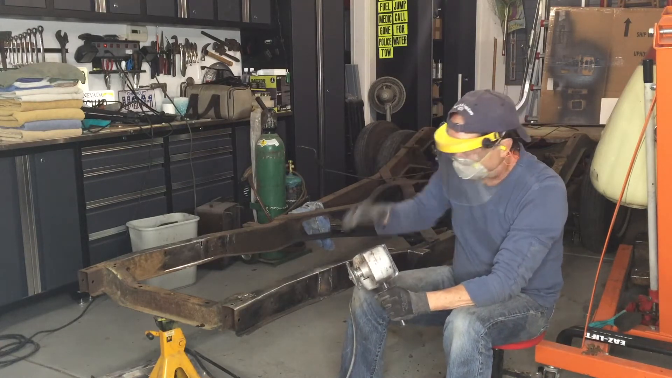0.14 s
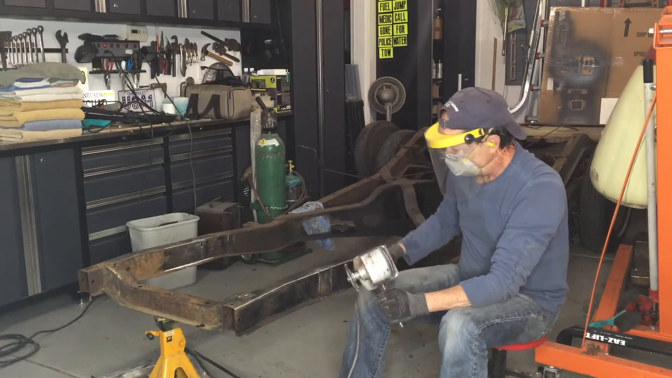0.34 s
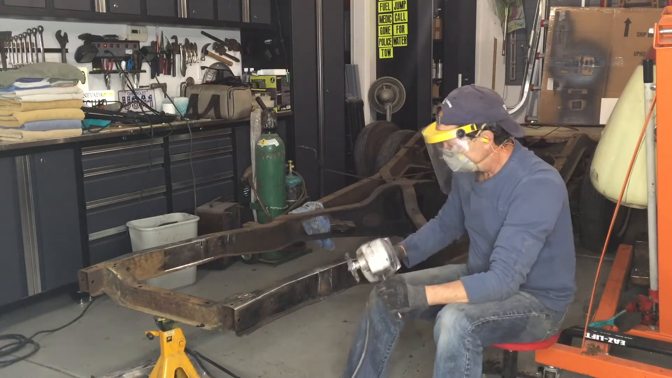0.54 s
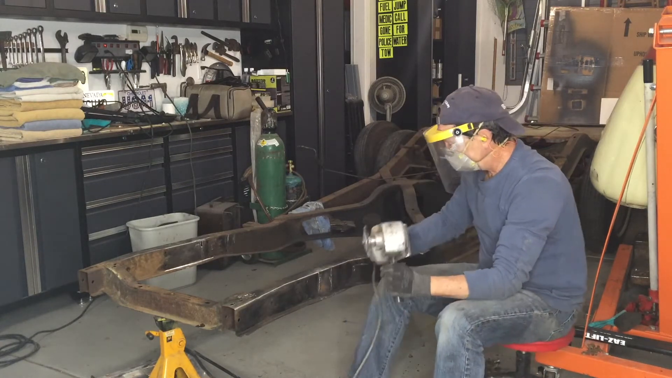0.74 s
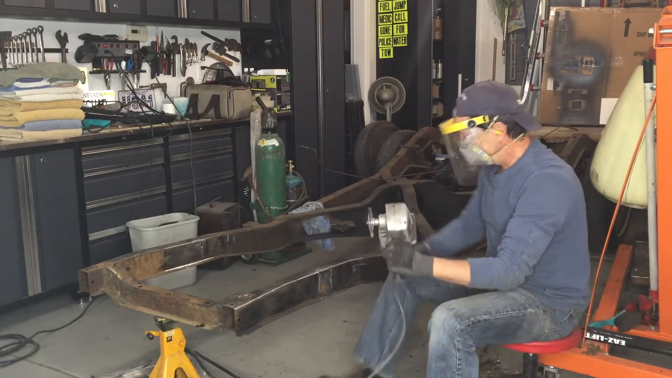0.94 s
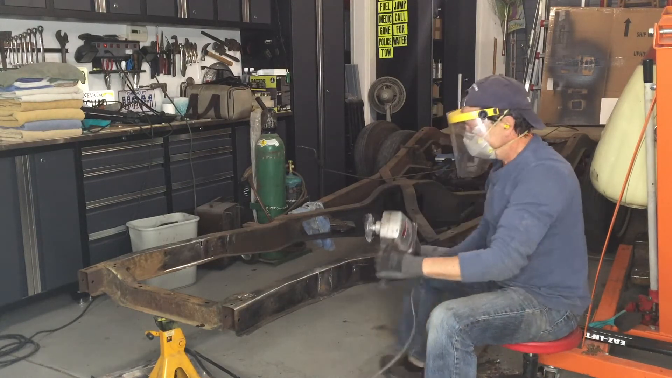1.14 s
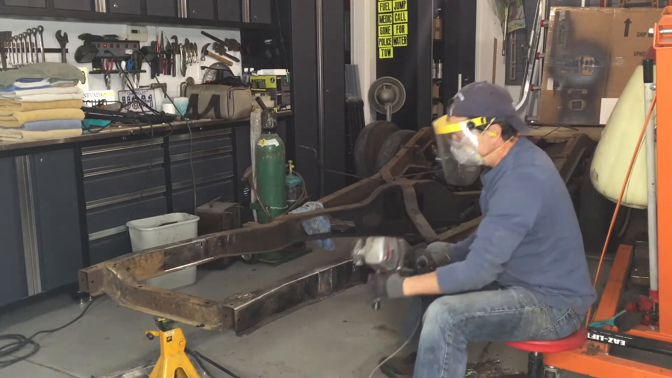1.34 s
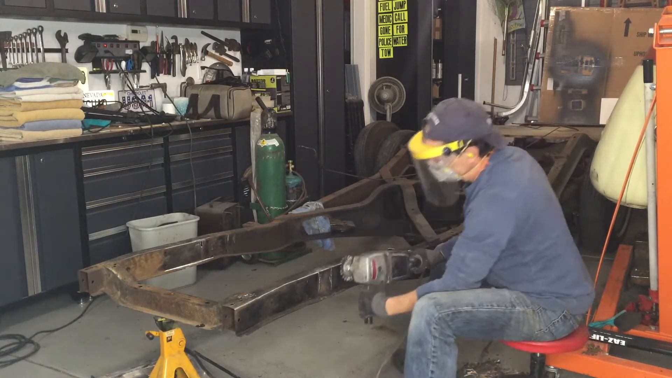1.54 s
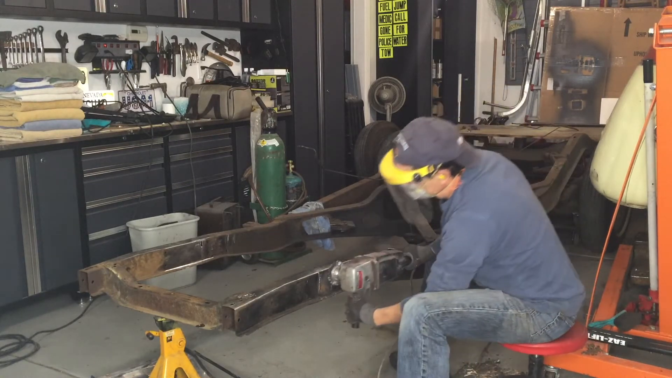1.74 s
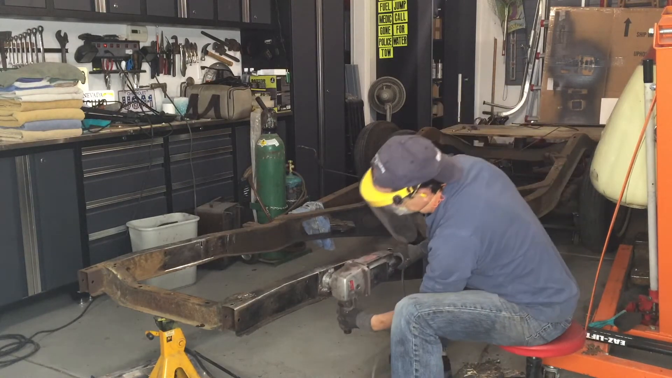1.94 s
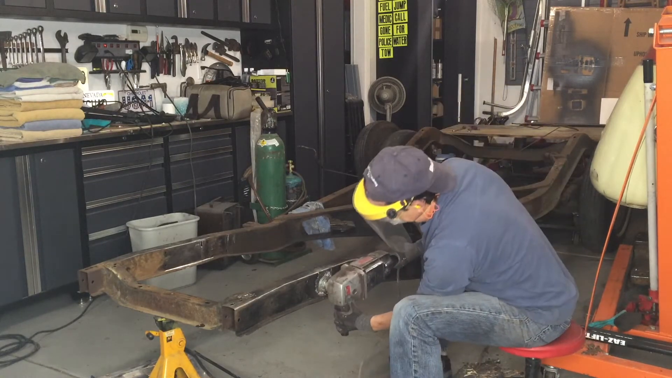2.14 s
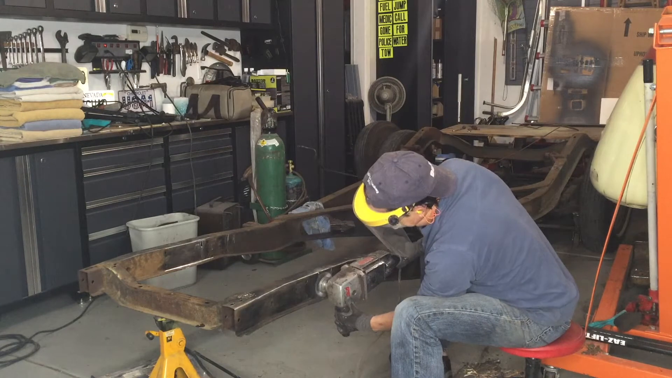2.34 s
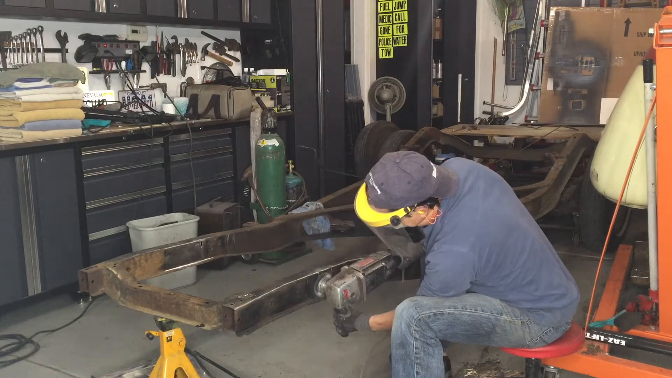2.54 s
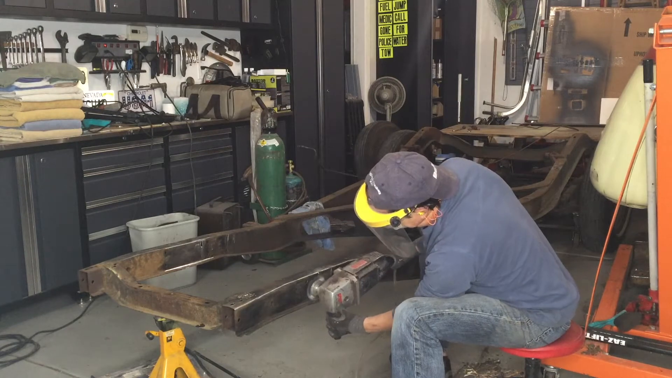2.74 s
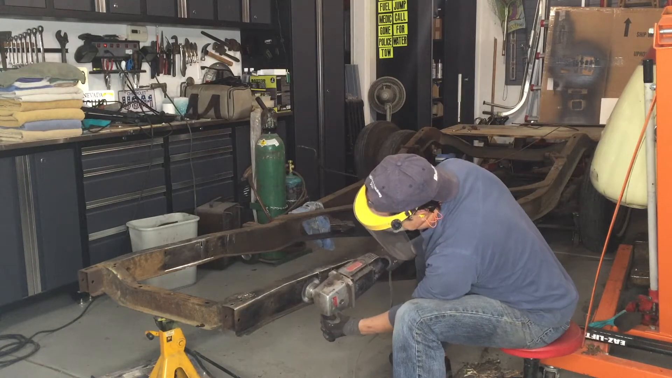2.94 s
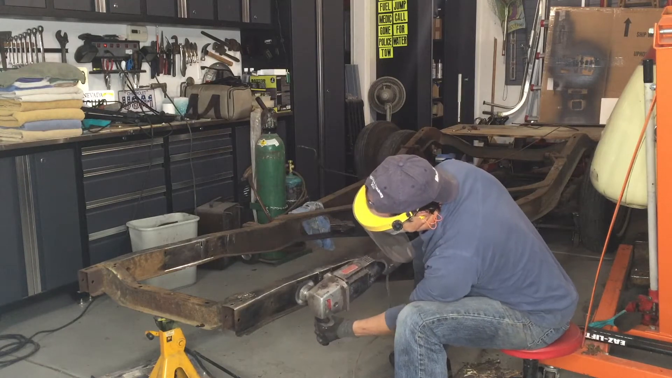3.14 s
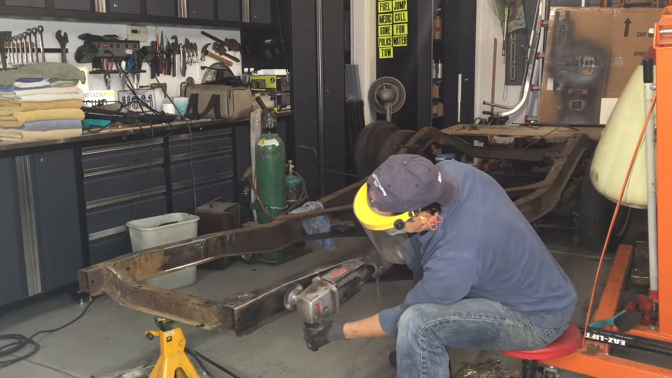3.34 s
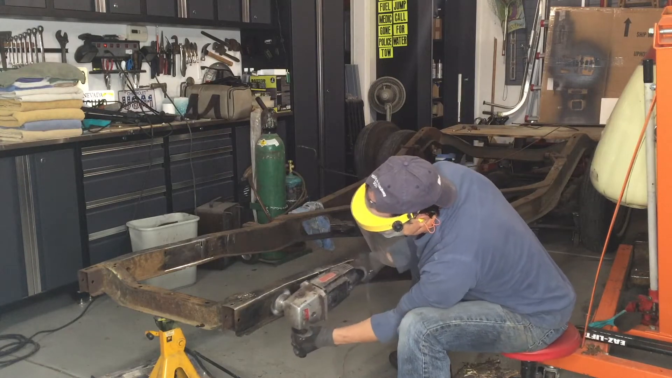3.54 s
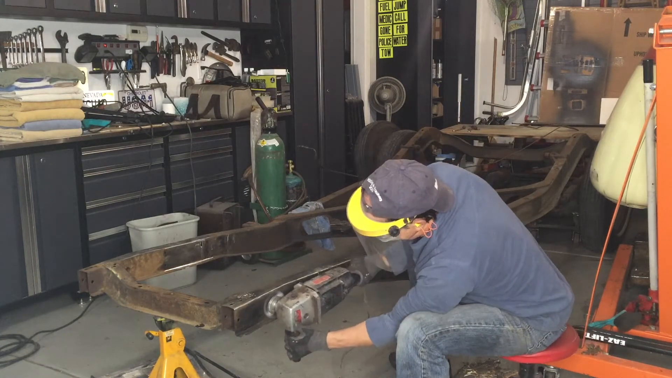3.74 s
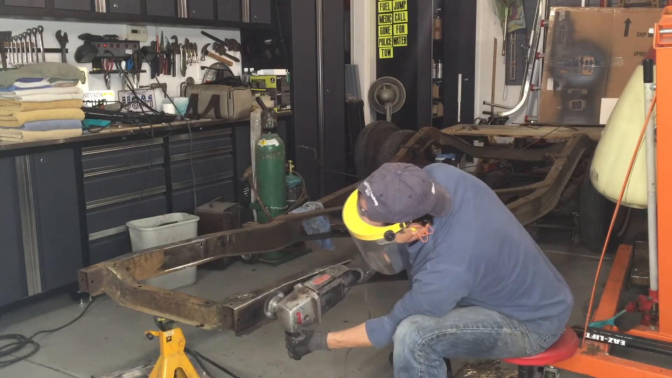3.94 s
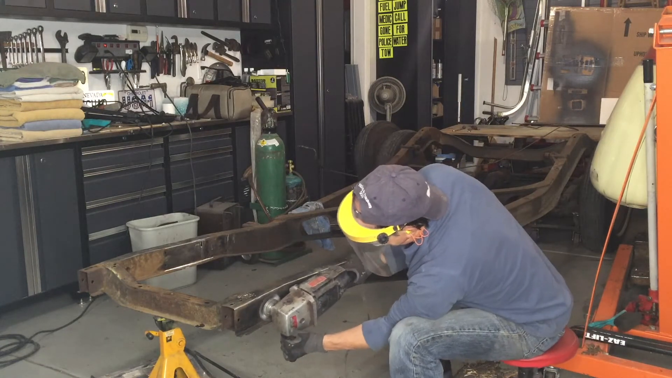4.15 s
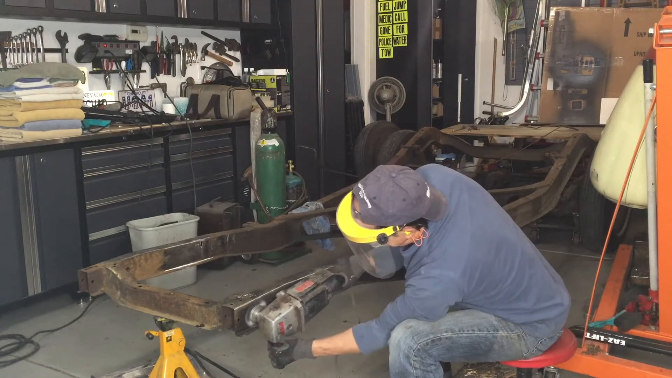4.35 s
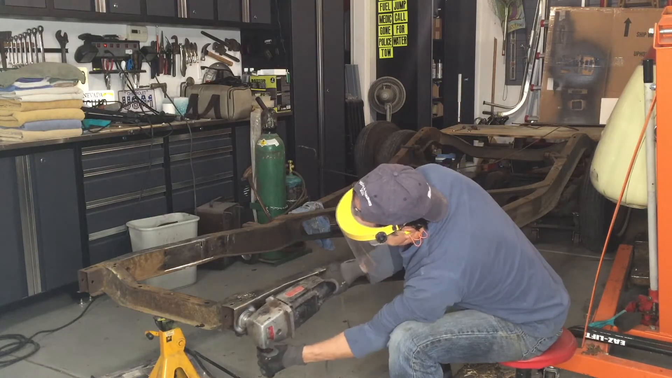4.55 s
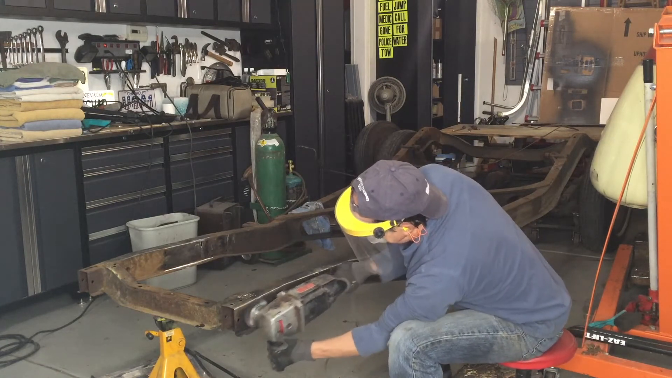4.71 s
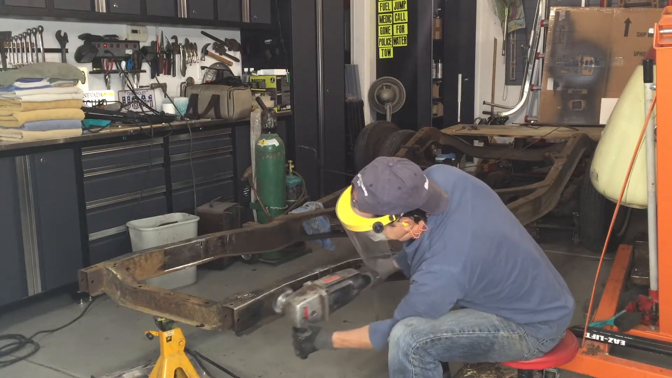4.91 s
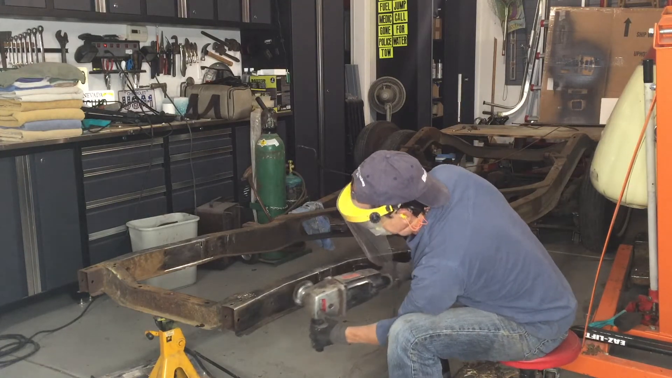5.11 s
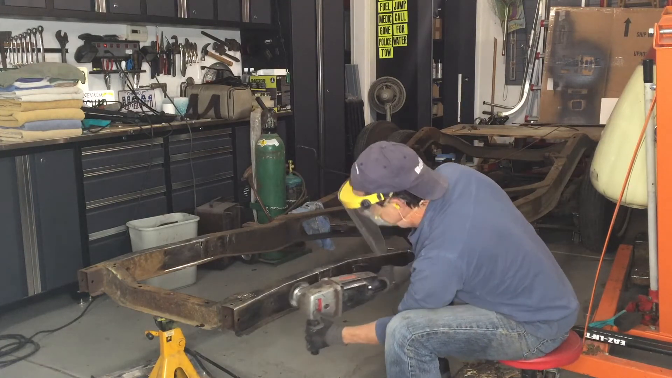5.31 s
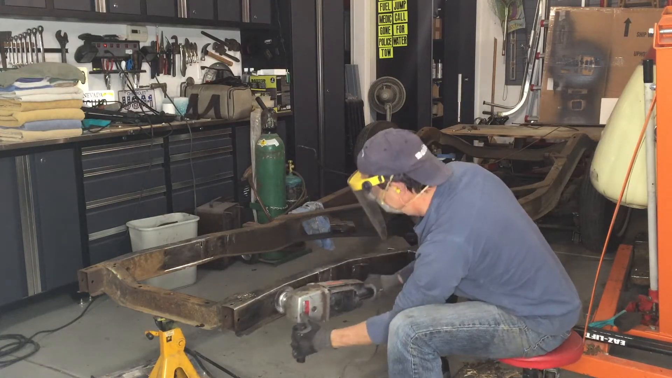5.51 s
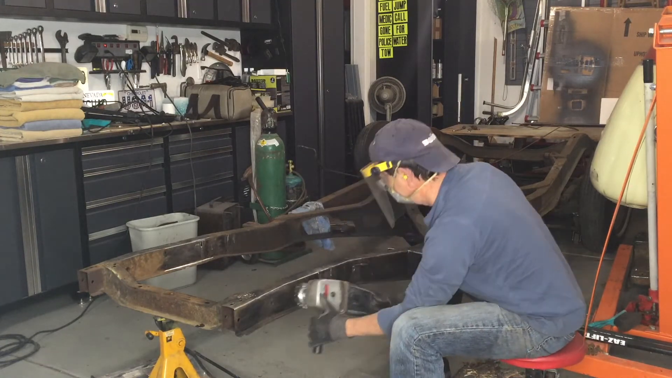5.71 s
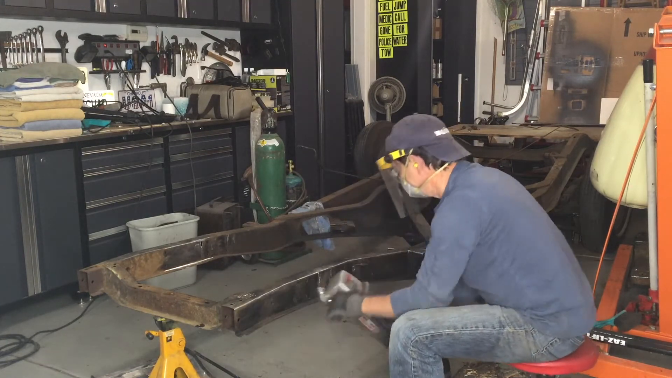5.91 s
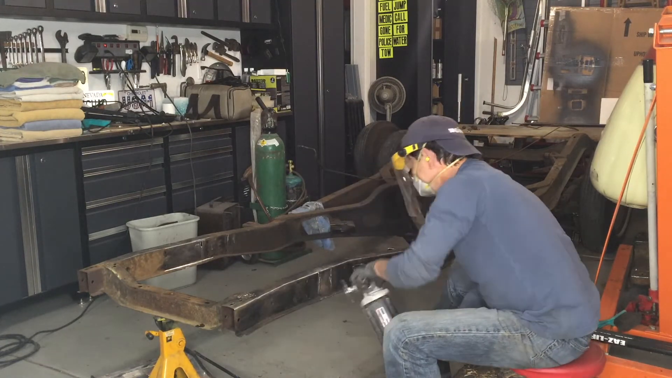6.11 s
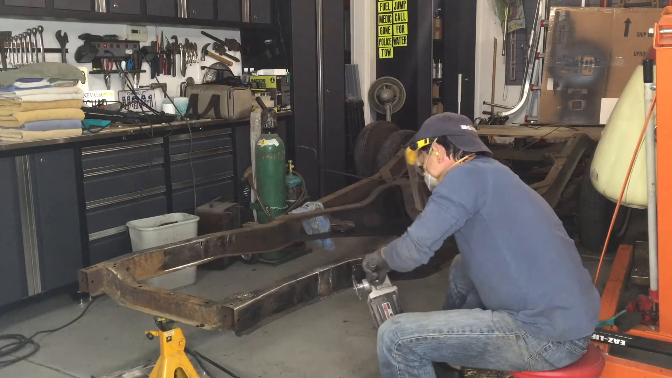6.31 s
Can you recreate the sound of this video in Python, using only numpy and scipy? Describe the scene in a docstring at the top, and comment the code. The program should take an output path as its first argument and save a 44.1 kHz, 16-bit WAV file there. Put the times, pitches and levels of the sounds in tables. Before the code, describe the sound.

A quiet garage with faint low background, heard from a few metres away with short echo. From 0.4 s a rolling stool jolts and rumbles, strongest near 0.7, with gritty crackle, scuffing cloth and soles, a rattling fitting and a caster squeak at 0.8. A sharp metal tick falls at 0.9; more caster bumps and a foot thump come around 1.4. The tool knocks firmly at 2.1 and again at 2.25. At 2.3 the grinder bursts on, running up rapidly, whirring and hissing, with harsh catches on ringing steel near 2.4 and 2.6. Released at 2.7, it coasts with a falling scrape. A shorter pull at 3.7 brings judder and scraping; then it slows, gear whine sinking, steel droning and rasping in separate rubs until 5.4. From 5.5 it brakes amid knocks, thin ringing, a squeak at 5.9 and soft brushing at 6.0, stopping near 6.3 with a shoe scuff.

```python
"""A worker shifts about on a rolling stool in a garage: casters rumble and squeak, shoes and sleeves scuff.
A tool knocks, then an angle grinder with a wire wheel is blipped twice and coasts down after each pull.
Gears whirr and wires hiss as random showers of tiny strikes; catches, rubs and scrapes make the steel sing.
The wheel brakes to a stop amid soft brushing, while the tool knocks again, a caster squeaks and a shoe scuffs.
Noise shaped by spectra makes the rough sounds, fading or wavering sine waves make the ringing ones."""
import sys
import numpy as np
from scipy import signal
from scipy.fft import rfft, irfft, next_fast_len
from scipy.io import wavfile
from scipy.ndimage import uniform_filter1d, map_coordinates

SR = 44100
rng = np.random.default_rng(int(sys.argv[2]) if len(sys.argv) > 2 else 0)


def persist_wave(psi):
    """Save psi, clipped to +-1, as 16-bit WAV."""
    counts = np.round(np.clip(psi, -1, 1) * 32767).astype(np.int16)
    wavfile.write(sys.argv[1], SR, np.atleast_2d(counts).T)


N = 285327
TIME = np.arange(N) / SR  # s
FULL_SPEED = 152  # turns/s

# pulls of the trigger: on (t/s), off (t/s), speed aimed at (turns/s), time constant of the run-up (t/s)
PULLS = [(2.314, 2.68, 151.5, .08), (3.725, 3.89, 143, .048)]
# pushes that roll the stool: start (t/s), length (t/s), level/dB
PUSHES = [(.5, 0.17, -59), (.67, 0.29, -52), (1.35, 0.089, -54), (1.7, .15, -81), (5.87, 0.035, -46)]
# spectrum of rubbing cloth and soles, also used for clicks and grit: f/Hz, relative level/dB
CLOTH = [(290, -13), (500, -4.5), (649, -5.5), (893, -1.5), (1320, 0), (1420, -2.5), (1930, 3), (2770, 3),
         (4800, -6), (5710, -3), (7750, -13), (9220, -14.5), (10700, -20), (12700, -18), (16000, -27)]


def amp(db):
    """Turn decibels into a gain."""
    return 10 ** (np.asarray(db) / 20)


def unit(x):
    """Scale to an average strength (rms) of 1."""
    return x / np.sqrt(np.mean(x ** 2) + 1e-20)


def along(points, hz):
    """Read a curve of (frequency, value) points on a logarithmic frequency axis."""
    f, v = np.transpose(points)
    return np.interp(np.log(hz + 1), np.log(f + 1), v)


def wobble(rate):
    """A smooth random curve through a given number of random points a second."""
    points = rng.standard_normal(int(N * rate / SR) + 4)
    return map_coordinates(points, [TIME * rate])


def filtered(x, response):
    """Multiply the spectrum of a sound by a response that depends on frequency."""
    padded = next_fast_len(len(x) + 8192)
    hz = np.fft.rfftfreq(padded, 1 / SR)
    return irfft(rfft(x, padded) * response(hz), padded)[:len(x)]


def noise(spectrum):
    """Random noise of rms 1 with the given spectrum."""
    return unit(filtered(rng.standard_normal(N), lambda hz: amp(along(spectrum, hz))))


def swell(start, length, attack, t60):
    """One gesture: a straight rise, a hold, and a release that falls 60 dB in t60 seconds."""
    rise = np.clip((TIME - start) / attack, 0, 1)
    return rise * amp(-60 * np.maximum(TIME - start - length, 0) / t60)


def swells(rows, attack, t60):
    """Envelope of a row of gestures, each (start, length, level)."""
    return sum(amp(db) * swell(start, length, attack, t60) for start, length, db in rows)


def blows(times, levels, t60, attack):
    """Envelope of a row of blows, each rising fast and dying away."""
    age = np.maximum(TIME - np.asarray(times)[:, None], 0)
    decay = np.exp(-np.log(1000) * age / t60)
    return amp(levels) @ (decay * (1 - np.exp(-age / attack)))


def ringing(times, levels, modes, stretch, scatter_db, smear):
    """Each blow rings every mode, a slightly wavering sine wave, at a new random strength."""
    total = 0
    for hz, db, t60 in modes:
        strengths = levels + db + scatter_db * rng.standard_normal(len(times))
        envelope = blows(times, strengths, t60 * stretch, attack=0.00081)
        phase = 2 * np.pi * hz * TIME + smear * wobble(40) + rng.uniform(0, 2 * np.pi)
        total = total + envelope * np.sin(phase)
    return total


def shifting(x, depth_db):
    """Raise and lower small random patches of time and frequency, so the colour keeps shifting."""
    z = signal.stft(x, nperseg=1024)[2]
    across_frequency = uniform_filter1d(rng.standard_normal(z.shape), size=3, axis=0)
    patches = unit(uniform_filter1d(across_frequency, size=9, axis=1))
    return signal.istft(z * amp(depth_db * patches), nperseg=1024)[1][:len(x)]


def garage(x, wet_db):
    """Add the echo of the garage: a tail of fading noise whose fade time depends on frequency."""
    # fade times of the tail: f/Hz, time to fall 60 dB (t/s)
    fade_times = [(150, 0.16), (1000, 0.64), (4000, 0.55), (12000, 0.42)]
    hz, t, z = signal.stft(rng.standard_normal(SR * 3 // 4), SR, nperseg=256)
    fading = z * amp(-60 * t / along(fade_times, hz)[:, None])
    tail = signal.istft(fading, SR, nperseg=256)[1]
    wet = signal.fftconvolve(x, tail / np.linalg.norm(tail))[:N]
    return (x + amp(wet_db) * wet) / np.hypot(1, amp(wet_db))


def through_body(x, band):
    """Keep one band of a sound, coloured by the resonances of tool and frame and by a few broad dips, at rms 1."""
    # resonances of tool and frame, plus broad dips near 4.8, 7.4 and 10.4 kHz: centre (f/Hz), width (f/Hz),
    # lift (level/dB)
    resonances = [(174, 36, 10), (236, 34, 6.5), (400, 30, 5), (457, 26, 6.5), (495, 24, -4), (524, 18, 5),
                  (572, 24, 3), (638, 22, 3.5), (700, 26, 3), (760, 50, 3), (860, 40, 2.5), (1010, 90, -1),
                  (1203, 50, 4), (1612, 50, 4), (1790, 120, -2), (1965, 40, 3), (2085, 120, 2),
                  (2255, 60, 2), (3000, 200, 2), (3280, 200, -2), (4100, 200, 2.5), (4420, 400, 3.5),
                  (4820, 400, -5), (5450, 400, 2), (6600, 900, 3), (7400, 500, -2.5), (9700, 900, 3.5),
                  (10400, 600, -5)]
    # overall spectrum of the whirr: f/Hz, relative level/dB
    whirr_spectrum = [(60, 0), (130, -8.5), (250, -8), (330, -5.5), (500, 0.5), (800, 2), (1300, 0),
                      (2600, -0.5), (4000, -5.5), (5500, -13.5), (7500, -19), (10000, -21.5),
                      (13000, -24.5), (16000, -30.5)]

    def response(hz):
        lift = sum(db / (1 + (2 * (hz - centre) / width) ** 2) for centre, width, db in resonances)
        edges = (1 + (band[0] / (hz + 1)) ** 10) * (1 + (hz / band[1]) ** 10)
        return amp(along(whirr_spectrum, hz) + lift) / np.sqrt(edges)

    return unit(filtered(x, response))


def quiet():
    """The steady background of the garage: faint noise, strongest in the bass."""
    # background spectrum: f/Hz, relative level/dB
    floor_spectrum = [(18, -48), (30, -16), (42, -9), (64, -0.5), (86, -19), (153, -1.5), (245, -13),
                      (415, -14), (473, -26), (540, -16), (740, -23), (937, -22), (1220, -24.5),
                      (2230, -27.5), (16000, -37.5)]
    return amp(-76) * noise(floor_spectrum)


def scuffs(grit_depth=0.1, treble_hz=4500):
    """Soles and sleeves slide in small jerks; the colour wanders and strokes differ in brightness."""
    # strokes: start (t/s), length (t/s), level/dB, treble lift (level/dB)
    strokes = [(0.42, 0.14, -71.5, 3), (0.578, 0.2, -61.5, -10), (0.757, 0.18, -57, 1),
               (0.982, 0.2, -77, 10.5), (1.128, 0.098, -56, -1), (1.24, 0.27, -68, -21),
               (1.552, 0.075, -64, 0.5), (1.732, 0.098, -62.5, -4), (6.304, 0.13, -55.5, 0)]
    jerks = amp(1.0 * wobble(35)) * np.exp(grit_depth * wobble(1200))
    rub = unit(shifting(noise(CLOTH), depth_db=2.8) * jerks)
    treble = filtered(rub, lambda hz: 1 - 1 / (1 + (hz / treble_hz) ** 4))
    total = 0
    for start, length, db, lift_db in strokes:
        envelope = amp(db) * swell(start, length, attack=0.047, t60=0.45)
        total = total + envelope * (rub + (amp(lift_db) - 1) * treble)
    return total


def bumps():
    """The casters jolt over the rough floor and the resonances of the stool's body answer; the last row is a
    light tap just before the tool knocks, ringing the same resonances."""
    # jolts: t/s, clunk level/dB, click level/dB; the last row is the tap before the tool knocks
    jolts = [(0.387, -73, -65), (0.417, -59, -58.5), (0.475, -55.5, -53), (0.522, -53, -68),
             (0.586, -55, -53), (0.678, -40, -53), (0.746, -50, -61), (1.147, -67, -57), (1.345, -45, -63),
             (1.398, -62, -55), (1.433, -60, -57), (1.567, -73, -58), (2.016, -54.5, -66)]
    # resonances of the stool: centre (f/Hz), width (f/Hz), relative level/dB
    stool_modes = [(185, 37, -5.5), (521, 39, 3), (610, 43, 8), (940, 90, -6), (1560, 100, -8.5),
                   (2190, 76, -6.5), (2560, 82, -8.5), (3470, 190, -24)]

    def body(f):
        total = 0
        for k, (centre, width, db) in enumerate(stool_modes):
            resonance = 1j * f * width / (centre ** 2 - f ** 2 + 1j * f * width)
            total = total + (-1) ** k * amp(db) * resonance  # neighbours have opposite signs
        return total

    s, clunk_db, click_db = np.transpose(jolts)
    clunk = blows(s, clunk_db, t60=0.17, attack=0.0012) * unit(filtered(rng.standard_normal(N), body))
    click = blows(s, click_db, t60=0.059, attack=0.00055) * noise(CLOTH)
    return garage(clunk + click, wet_db=-3)


def grit(grains_per_s=140, level_db=-13, dull_hz=3000):
    """Specks of dirt crack at random under the casters while the stool rolls."""
    cracks = (rng.random(N) < grains_per_s / SR) * rng.standard_normal(N)
    dulled = filtered(cracks, lambda hz: amp(along(CLOTH, hz)) / (1 + (hz / dull_hz) ** 2))
    crackle = garage(unit(dulled), wet_db=5.0)
    return amp(level_db) * swells(PUSHES, attack=0.059, t60=0.53) * crackle


def squeak(rows, overtone_db=-10):
    """A caster sticks and slips: a rough gliding tone and its octave."""
    s, hz, db = np.transpose(rows)
    pitch = np.interp(TIME, s, hz) * (1 + .019 * wobble(250))
    phase = 2 * np.pi * np.cumsum(pitch) / SR
    tone = np.sin(phase) + amp(overtone_db) * np.sin(2 * phase)
    level = amp(np.interp(TIME, s, db, left=-140, right=-140))
    return level * unit(tone * amp(1.3 * wobble(69.8)))


def stool():
    """Feet thump down, casters rumble and squeak as the stool is pushed, and a loose fitting rattles."""
    # rumble spectrum of the casters: f/Hz, relative level/dB
    caster_spectrum = [(21, -46), (35, -11), (59, -2), (112, -18.5), (179, 0.5), (379, -13), (522, 2),
                       (623, -3.5), (675, -14), (959, -19), (1110, -11), (1220, -18), (1600, -16),
                       (2080, -29), (3520, -120)]
    # a foot is set down: t/s, level/dB
    footfalls = [(0.962, -53), (1.393, -51), (5.903, -61)]
    # spectrum of its dull thump: f/Hz, relative level/dB
    thump_spectrum = [(30, -22), (70, -1), (110, 0), (190, 0), (300, -0.5), (600, -22), (1500, -70)]
    # rattles of the loose fitting: t/s, level/dB
    rattle_hits = [(0.387, -68), (0.683, -49), (1.366, -55), (1.418, -56), (1.432, -58), (1.456, -66),
                   (2.016, -59)]
    # modes of the fitting: f/Hz, relative level/dB, fade time before stretching (t/s)
    fitting_modes = [(1300, -10.5, 0.26), (1480, -6, 0.19), (1717, -10, 0.13), (1782, -3, 0.26),
                     (2180, -10, 0.23)]
    # one curve for each squeak: t/s, pitch (f/Hz), level/dB
    squeak_curves = [
        [(0.783, 1030, -68), (0.803, 1089, -45), (0.852, 1142, -44.5), (.88, 1130, -46.5), (.9, 1106, -63),
         (.925, 1145, -51), (.96, 1122, -61), (.99, 1113, -62), (1.02, 1130, -86)],
        [(5.85, 1160, -64), (5.9, 1150, -56), (5.96, 1118, -53.5), (6.02, 1114, -74)],
    ]
    roughness = amp(1.6 * wobble(49.52))
    rumble = swells(PUSHES, attack=0.081, t60=0.56) * unit(noise(caster_spectrum) * roughness)
    thumps = blows(*np.transpose(footfalls), t60=0.45, attack=0.0069) * noise(thump_spectrum)
    rattles = ringing(*np.transpose(rattle_hits), fitting_modes, stretch=0.83, scatter_db=7.5, smear=1.7)
    squeaks = garage(sum(squeak(rows) for rows in squeak_curves), wet_db=-7)
    return rumble + thumps + rattles + squeaks


def boom_tone(waver=1.0):
    """Two close low tones beat against each other, at rms 1 together."""
    # the pair: f/Hz, relative level/dB
    pair = [(165, 0), (182, -4)]
    total = 0
    for hz, db in pair:
        phase = 2 * np.pi * hz * TIME + waver * wobble(16) + rng.uniform(0, 2 * np.pi)
        total = total + amp(db) * np.sin(phase)
    return unit(total)


def knocks(wash_db=-6, tick_wash_db=-20):
    """The tool knocks: a boom, a thud, a clack, a short metal tick and the ring of its housing."""
    # knocks: t/s, then boom, thud, clack, tick and ring, each level/dB
    knock_rows = [(0.896, -55, -75, -51, -30, -65), (2.076, -40, -42.5, -33.5, -39.5, -34.5),
                  (2.242, -53, -46, -42.5, -64, -45), (5.532, -68, -66, -51, -54, -45),
                  (5.590, -59, -49, -39, -42, -52), (5.628, -67, -53, -57, -62, -63),
                  (5.788, -75, -60, -44.5, -40, -57), (5.858, -75, -66, -45, -46, -56),
                  (5.896, -57.5, -58, -56, -50, -60), (6.146, -77, -73, -65, -70, -68),
                  (6.171, -71, -70, -62, -64, -62), (6.228, -78, -76, -70, -64, -66)]
    # spectrum of the housing's clack: f/Hz, relative level/dB
    clack_spectrum = [(300, -49), (700, 12), (1000, 3.5), (1500, 1), (2300, 0.5), (3800, -7), (5500, -16.5),
                      (9000, -34)]
    # spectrum of the tick of metal on metal: f/Hz, relative level/dB
    tick_spectrum = [(2000, -48), (3050, 0), (3800, -16), (5200, -13), (6100, 2.5), (7000, -11.5),
                     (8200, -11.5), (10000, -19.5), (16000, -30)]
    # modes of the housing: f/Hz, relative level/dB, fade time before stretching (t/s)
    housing_modes = [(237, -17, .4), (458, -12, .55), (735, -19, .5), (797, -13, .45), (926, -9.5, .28),
                     (968, -12, .42), (1147, -18, .5), (1427, -13, .45), (1884, -10, .25), (2105, -12, .3),
                     (2988, -15, .2), (3811, -21, .25)]
    s, boom_db, thud_db, clack_db, tick_db, ring_db = np.transpose(knock_rows)
    boom = blows(s, boom_db, t60=0.65, attack=0.025) * boom_tone()
    thud = blows(s, thud_db, t60=0.5, attack=0.035) * through_body(rng.standard_normal(N), (130, 700))
    # clack and tick are each a dry snap followed by the diffuse wash of the garage
    clack_snap = blows(s, clack_db, t60=0.032, attack=0.00027)
    clack_wash = blows(s, clack_db + wash_db, t60=0.62, attack=0.013)
    clack = (clack_snap + clack_wash) * noise(clack_spectrum)
    tick_snap = blows(s, tick_db, t60=0.024, attack=0.0014)
    tick_wash = blows(s, tick_db + tick_wash_db, t60=0.39, attack=.004)
    tick = (tick_snap + tick_wash) * noise(tick_spectrum)
    ring = ringing(s, ring_db, housing_modes, stretch=1.15, scatter_db=1.5, smear=0.9)
    return boom + thud + clack + tick + ring


def catches():
    """The wheel snatches at the frame: a harsh burst of noise and ringing steel."""
    # catches: start (t/s), length (t/s), then clang, spit and ring, each level/dB
    catch_rows = [(2.315, 0.0085, -33.5, -49, -46.5), (2.386, 0.006, -20.5, -24.5, -26.5),
                  (2.409, 0.018, -25, -29.5, -37), (2.604, 0.006, -31, -25, -42),
                  (5.591, 0.0063, -39.5, -64, -54)]
    # modes of the steel frame: f/Hz, relative level/dB, fade time before stretching (t/s)
    steel_modes = [(1237, -8, .6), (1335, -3, .22), (1423, -6, .45), (1521, -3, .22), (1638, -6, .5),
                   (2247, -6, .5), (2440, -3, .4), (2988, -13, .7), (3235, -16, .6), (3445, -6.5, .5),
                   (3747, -20, .5), (4206, -13, .5), (5529, -16, .23), (6045, -18, .3), (6767, -15, .2),
                   (7828, -18, .3)]
    s, length, clang_db, spit_db, ring_db = np.transpose(catch_rows)
    clang_noise = through_body(rng.standard_normal(N), (1100, 4000))
    clang = swells(zip(s, length, clang_db), attack=0.0031, t60=0.028) * clang_noise
    spit_noise = through_body(rng.standard_normal(N), (4500, 16000))
    spit = swells(zip(s, length, spit_db), attack=0.0024, t60=0.048) * spit_noise
    ring = ringing(s, ring_db, steel_modes, stretch=0.9, scatter_db=1.8, smear=0.6)
    return garage(clang + spit, wet_db=-1.0) + ring


def singing():
    """Rubbed steel drones and rasps; thin tones falter and die away as the wheel brushes to a stop."""
    # rubs along the frame: start (t/s), length (t/s), drone level/dB, rasp level/dB
    rubs = [(3.458, 0.29, -48, -46), (3.764, 0.083, -41, -39), (3.976, 0.3, -45.5, -44),
            (4.364, 0.43, -46, -45.5), (4.934, 0.086, -40.5, -61), (5.067, 0.23, -53, -50.5),
            (5.39, 0.3, -59, -64)]
    # tones of the low drone: f/Hz, relative level/dB
    drone_tones = [(402, 0), (705, -6), (742, -6), (858, -6), (1203, -9)]
    # spectrum of the rasp: f/Hz, relative level/dB
    rasp_spectrum = [(1500, -63), (1900, -9), (2000, -2.5), (2160, -6), (2300, -7), (2900, -34)]
    # thin tones that sing on: f/Hz, level/dB, fade time (t/s)
    thin_tones = [(1518, -67, 2), (2965, -70, 1.9), (5179, -79, 1.2), (5800, -70, 1.7), (10239, -80, 1.7),
                  (13932, -86, 1.5), (15633, -87, 2.1)]
    # spectrum of the last soft brushing: f/Hz, relative level/dB
    brush_spectrum = [(400, -30), (640, 7), (900, -21), (1900, -10), (2650, 4), (3200, -8), (3550, -2),
                      (4000, -22), (6000, -24), (6700, -15), (7600, -35), (12000, -50)]
    last_song = (5.76, 0.16)  # start (t/s), length (t/s)
    last_brush = (5.98, 0.21, -61.5)  # start (t/s), length (t/s), level/dB

    def drift(hz, depth_db):
        tone = np.sin(2 * np.pi * hz * TIME + 1.3 * wobble(30))
        return unit(tone * amp(depth_db * wobble(16)))

    s, length, drone_db, rasp_db = np.transpose(rubs)
    chord = unit(sum(amp(db) * drift(hz, depth_db=3.5) for hz, db in drone_tones))
    drone = swells(zip(s, length, drone_db), attack=0.017, t60=0.48) * chord
    rasp = swells(zip(s, length, rasp_db), attack=0.032, t60=0.78) * noise(rasp_spectrum)
    lines = sum(amp(db) * swell(*last_song, attack=0.1, t60=t60) * drift(hz, depth_db=4)
                for hz, db, t60 in thin_tones)
    brush_noise = unit(noise(brush_spectrum) * amp(2.5 * wobble(45)))
    brush = swells([last_brush], attack=0.057, t60=0.86) * brush_noise
    return drone + rasp + lines + brush


def motor():
    """Speed and effort in turns/s: each pull runs the rotor up, drag slows it, friction halts it."""
    drag_per_s = .755  # rate of the exponential slowing
    stop_s, brake_s = 6.32, 0.85  # when the wheel stops, and how long friction takes to halt it
    torque_speed = 57  # under power the gears are at least as loud as at this speed
    speed, torque = np.zeros(N), np.zeros(N)
    for on, off, top, spin_up in PULLS:
        shortfall = top - np.interp(on, TIME, speed)
        driven = top - shortfall * np.exp(-np.clip(TIME - on, 0, off - on) / spin_up)
        coasting = np.exp(-drag_per_s * np.maximum(TIME - off, 0))
        speed = np.where(TIME < on, speed, driven * coasting)
        torque = torque + torque_speed * ((TIME > on) & (TIME < off))
    speed = speed * np.clip((stop_s - TIME) / brake_s, 0, 1)
    return speed, np.maximum(speed, torque)


def loudness(effort, full_db, doubling_db, calm_db):
    """Gain that grows with each doubling of speed and drops when the gears stop chattering."""
    chatter_speed, steepness = 55.2, 13  # turns/s at which chatter stops, and how abruptly
    calm = 1 / (1 + (effort / chatter_speed) ** steepness)
    level_db = full_db + doubling_db * np.log2((effort + 1) / FULL_SPEED) - calm_db * calm
    return (effort > 0) * amp(level_db)


def resonating(speed, db, centre, octaves):
    """Gain that peaks as the rotor passes one speed, with a half width in octaves."""
    distance = np.abs(np.log2((speed + 1) / centre) / octaves)
    return (speed > 0) * amp(db) / np.sqrt(1 + distance ** 4)


def flicker(speed, depth_db=1.9):
    """The slower the wheel turns, the more its wires flick one by one."""
    slowness = (1 - speed / FULL_SPEED) ** 2
    return amp(depth_db * slowness * (wobble(25) + wobble(140)))


def whine(speed):
    """Backlash smears each gear tone; it blooms as the rotor passes one speed, louder under power."""
    # tones: multiple of the speed, peak level/dB, speed of the peak (turns/s), half width (octaves)
    gear_tones = [(24, -44.5, 116, .2), (24, -48, 80, .12), (37, -50, 117, .12)]

    def line(multiple):
        smeared = speed * (1 + .024 * wobble(500))
        phase = multiple * 2 * np.pi * np.cumsum(smeared) / SR
        return unit(np.sin(phase) * amp(2.8 * wobble(24)))

    pulling = sum((TIME > on) & (TIME < off) for on, off, *_ in PULLS)
    tones = sum(resonating(speed, *peak) * line(multiple) for multiple, *peak in gear_tones)
    return garage(amp(1.5 * pulling) * tones, wet_db=-6)


def scrape(turn):
    """Wire tips drag over the steel: a band of noise whose pitch rises and falls with the wheel's speed."""
    # hard scrapes: start (t/s), length (t/s), level/dB
    scrape_rows = [(2.8, 0.36, -47), (3.735, 0.34, -43.5), (4.2, 0.23, -57)]
    order, half_width_hz = 22.8, 260  # centre as a multiple of the speed, half width of the band
    cosine_part = wobble(2 * half_width_hz) * np.cos(order * turn)
    sine_part = wobble(2 * half_width_hz) * np.sin(order * turn)
    return swells(scrape_rows, attack=0.031, t60=0.57) * unit(cosine_part + sine_part)


def throb(speed, turn, judder):
    """The bass: a deep throb comes and goes, the unbalanced rotor shakes and each judder thumps."""
    # deep throbs: start (t/s), length (t/s), level/dB
    throb_rows = [(2.38, .16, -62), (4.57, .13, -60), (4.86, .08, -61), (4.99, 0.11, -55),
                  (5.21, 0.08, -56), (5.4, 0.13, -56)]
    # spectrum of the thump: f/Hz, relative level/dB
    judder_spectrum = [(30, -22), (70, -1), (110, 0), (190, 0), (300, -0.5), (600, -22), (1500, -70)]

    def rough(phase):
        return unit(np.sin(phase + 1.3 * wobble(35)) * amp(2.5 * wobble(25)))

    deep = swells(throb_rows, attack=0.032, t60=0.32) * rough(2 * np.pi * 49.9 * TIME)
    shake = resonating(speed, db=-65, centre=82, octaves=.3) * rough(turn)
    thump = amp(-14.5) * judder * noise(judder_spectrum)
    return deep + shake + thump


def grinder(beat=0.03, grain=0.23, flutter_db=0.18):
    """Gear teeth and wire tips strike in dense random showers that pulse once a turn."""
    # the tool judders in the hands: start (t/s), length (t/s), level/dB
    judder_rows = [(3.742, 0.12, -36), (3.9, 0.057, -41.5), (4.37, 0.32, -49), (4.78, 0.053, -47),
                   (4.95, 0.035, -39), (5.07, 0.03, -56)]
    # wire tips graze the steel: start (t/s), length (t/s), level/dB
    graze_rows = [(2.316, 0.039, -46.5), (3.79, 0.094, -44), (4.325, 0.044, -41.5), (4.835, 0.01, -46),
                  (5.745, 0.018, -57)]
    # spectrum of the running tool's low hum: f/Hz, relative level/dB
    hum_spectrum = [(110, -42), (150, -15), (166, 4.5), (186, 1.5), (215, -15), (300, -39.5)]
    soft_speed = 12  # turns/s; below this the wires bend softly and the treble fades
    speed, effort = motor()
    turn = 2 * np.pi * np.cumsum(speed) / SR
    judder = swells(judder_rows, attack=0.014, t60=0.61)
    grazes = swells(graze_rows, attack=0.009, t60=0.29)

    shudder = np.hypot(loudness(effort, full_db=-44.5, doubling_db=1, calm_db=16.4), judder)
    # a judder also rattles the gears, 3 dB more softly
    whirr = np.hypot(loudness(effort, full_db=-32.5, doubling_db=5.4, calm_db=5.3), amp(-3) * judder)
    sharp = effort / np.hypot(effort, soft_speed)
    wires = sharp * loudness(effort, full_db=-39, doubling_db=6.38, calm_db=1.6)
    hiss = flicker(speed) * np.hypot(wires, grazes)
    pulse = (1 + beat * np.cos(turn)) * amp(flutter_db * wobble(40))

    def shower(band):
        strikes = pulse * rng.standard_normal(N) * np.exp(grain * wobble(2500))
        return through_body(shifting(garage(strikes, wet_db=-6), depth_db=1.67), band)

    gears = (shower((600, 1700)) + sharp * shower((1700, 4500))) / np.hypot(1, sharp)
    rattle = shudder * shower((135, 600)) + whirr * gears + hiss * shower((4500, 20000))
    rumble_noise = noise([(25, -12), (50, 7.5), (110, 1.0), (200, -15), (500, -88)])
    rumble = (speed > 0) * amp(-68.5) * rumble_noise
    hum = loudness(effort, full_db=-54.5, doubling_db=3.8, calm_db=0.92) * noise(hum_spectrum)
    return rattle + whine(speed) + scrape(turn) + throb(speed, turn, judder) + rumble + hum


def scene():
    """All sources over the quiet of the garage, alike in both channels."""
    worker = scuffs() + bumps() + grit() + stool()
    tool = knocks() + catches() + singing() + grinder()
    mono = quiet() + worker + tool
    return np.array([mono, mono])


def record(dry):
    """The recorder cuts the deepest bass and keeps nothing above its band limit."""
    low_cut_hz, top_hz = 41, 15850

    def passband(hz):
        return (hz < top_hz) / np.sqrt(1 + (low_cut_hz / (hz + 1)) ** 20)

    return np.array([filtered(channel, passband) for channel in dry])


dry = scene()
out = record(dry)
persist_wave(out)
```